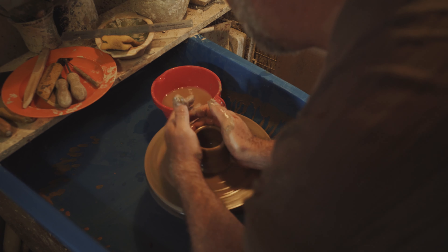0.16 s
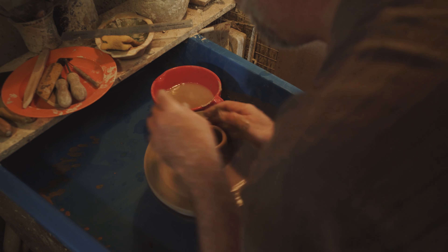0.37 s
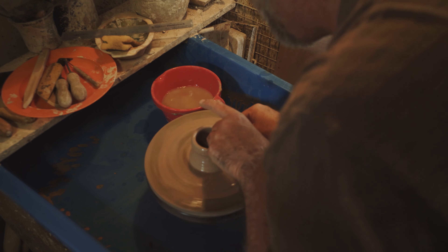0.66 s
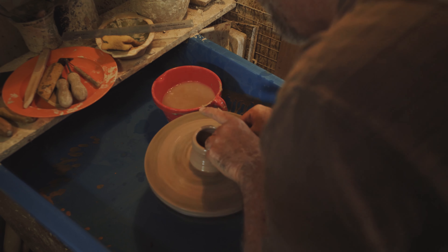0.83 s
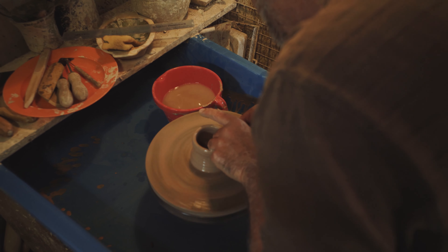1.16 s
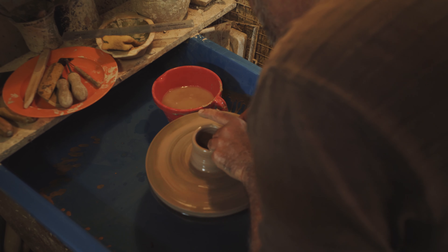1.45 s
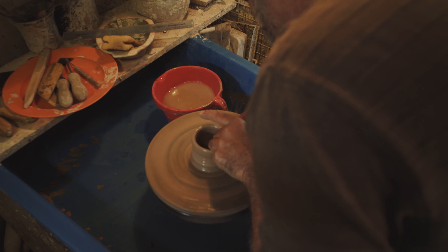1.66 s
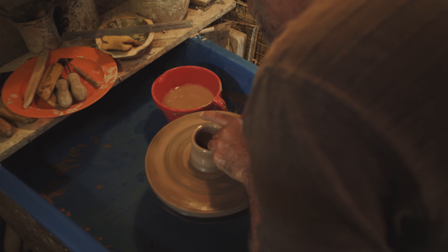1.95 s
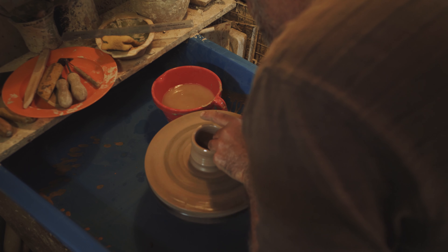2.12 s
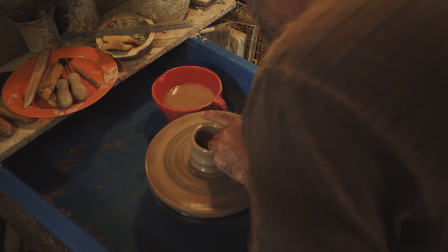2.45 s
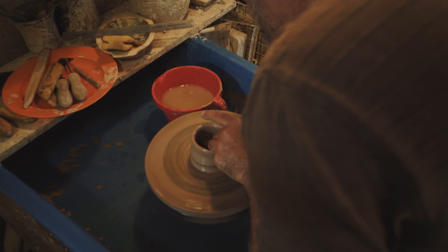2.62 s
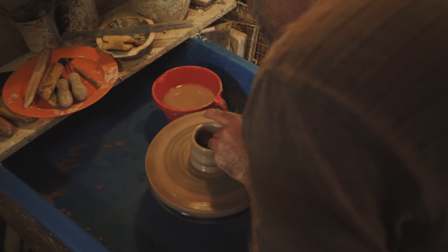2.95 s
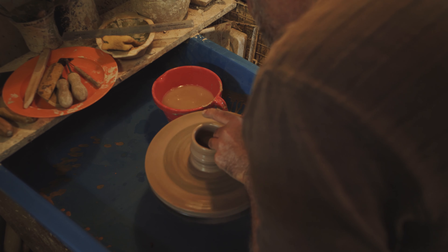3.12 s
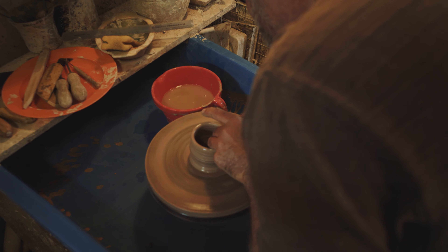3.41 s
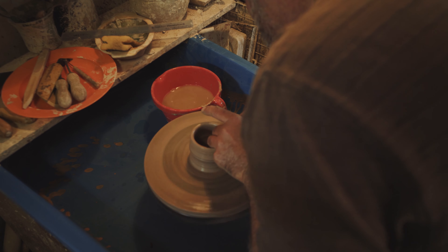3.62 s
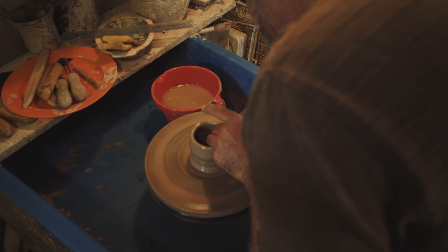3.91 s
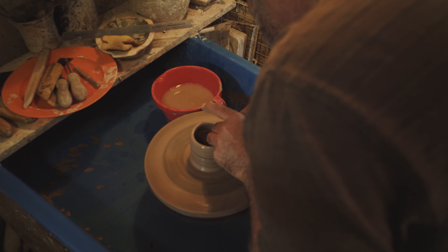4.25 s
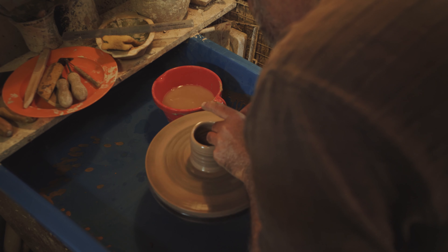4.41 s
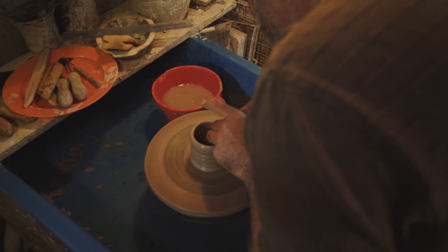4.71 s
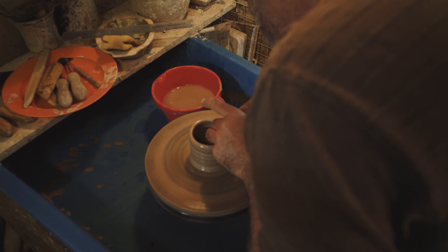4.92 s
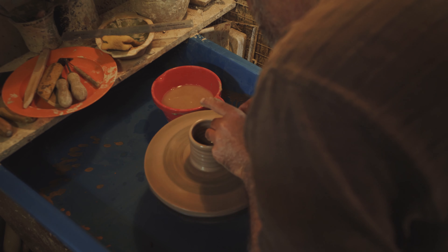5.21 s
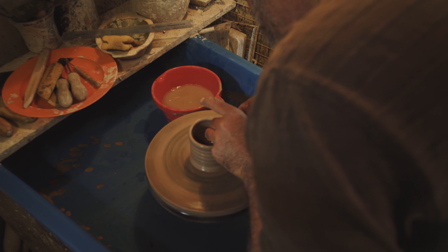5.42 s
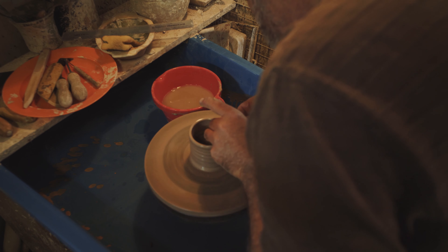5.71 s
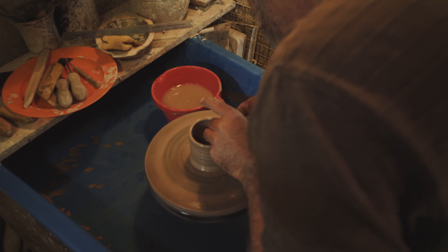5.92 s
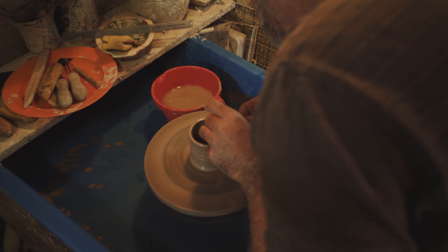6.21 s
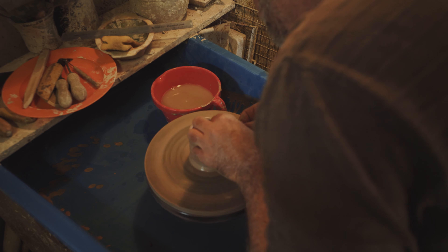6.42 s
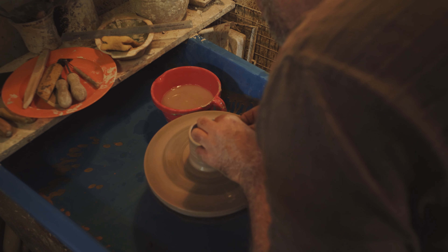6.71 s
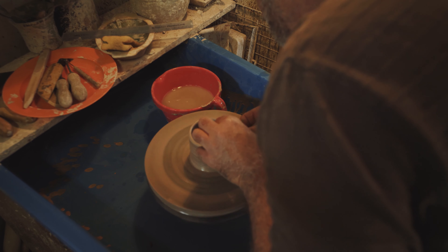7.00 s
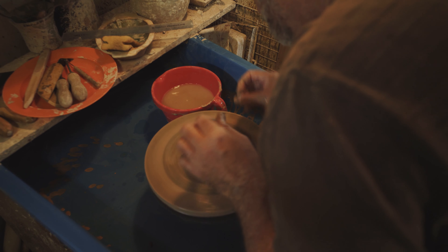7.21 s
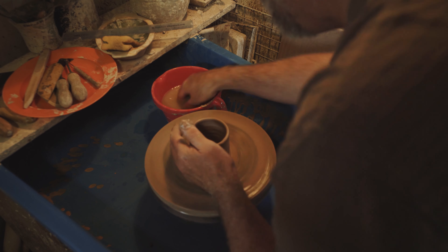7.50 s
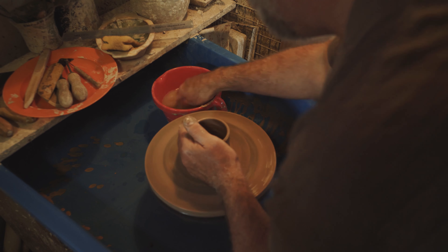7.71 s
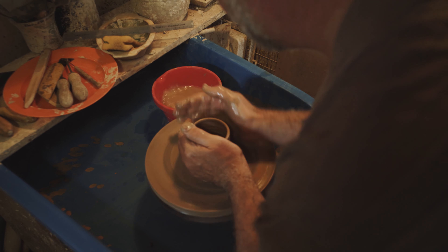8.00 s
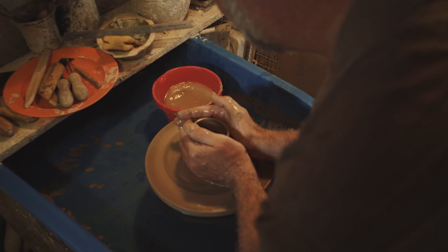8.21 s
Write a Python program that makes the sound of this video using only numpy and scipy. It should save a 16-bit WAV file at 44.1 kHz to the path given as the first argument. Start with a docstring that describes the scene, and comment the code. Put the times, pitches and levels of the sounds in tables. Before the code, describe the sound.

Close mono pickup in a small, fairly dry studio: steady mains-like hum, lumpy low rumble and airy motor whirr throughout. Early on come a soft tray bump, one small wet tick and a brief scratchy rub of a finger on wet clay. The middle is almost only the wheel, slightly slower. Near the end another low bump, a quick slosh, bubbly plops and fine spattering drops.

```python
"""A small pottery studio with an electric wheel running close by. Rectified mains pulses buzz in its motor,
built from tones of the mains ripple and of a shaft that slows as the hands load the clay. Belt and bearings
rumble in the tray and the housing whirrs, both as filtered noise. Sleeves and wet fingers rustle in shaped
noise, then a hand dips into a cup of slip water and drips: noise bursts and sliding, damped sines."""
import sys
import numpy as np
from scipy import signal
from scipy.fft import rfft, irfft, next_fast_len
from scipy.io import wavfile
from scipy.ndimage import uniform_filter1d, map_coordinates

SR = 44100
rng = np.random.default_rng(int(sys.argv[2]) if len(sys.argv) > 2 else 0)


def dump_mix(stems):
    """Bounce the given channels to the path in sys.argv[1] as a 16-bit WAV at rate SR."""
    frames = np.atleast_2d(stems).T  # one column per channel
    limited = np.clip(frames, -1, 1)  # hard clip at full scale
    pcm = np.round(limited * 32767).astype(np.int16)
    wavfile.write(sys.argv[1], SR, pcm)


def natural_amplitude(level_db):
    """Convert a level in decibels to a linear amplitude factor, elementwise."""
    exponent = np.asarray(level_db, float) / 20
    return 10 ** exponent


N = 368676  # length in samples

# Shaft speed under the load of the hands. Each row: time in seconds, turns per second.
SHAFT_SPEED = [(0, 62), (.6, 60.5), (1.4, 58.5), (1.9, 56), (2.4, 55.8), (2.65, 50.6), (3.15, 49.2),
               (3.55, 49.4), (3.8, 46), (5.3, 45.7), (6.3, 46.3), (6.65, 46.9), (6.8, 47.6), (7.75, 47.6),
               (7.95, 60.4), (8.36, 60.4)]
# Motor tones at m x ripple + n x shaft. Each row: multiple m of the ripple, multiple n of the shaft speed.
TONE_ORDERS = [(1, 0), (2, 0), (3, 0), (4, 0), (5, 0), (7, 0), (8, 0), (9, 0), (10, 0), (13, 0), (14, 0),
               (15, 0), (16, 0), (17, 0), (18, 0), (19, 0), (22, 0), (23, 0), (24, 0), (1, 1), (2, -1),
               (2, -2), (2, 1), (2, 2), (4, 2), (13, 1), (16, -1), (16, 1), (17, 1), (23, 1)]
# Strength of those tones, in the same order. Each entry: level in dB against the second ripple harmonic.
TONE_LEVELS_DB = [-15, 0, -2, -23.5, -29.5, -46.5, -44, -38, -43.5, -25.5, -26.5, -22, -20.5, -39.5, -45.5,
                  -26.5, -35.5, -40, -45, -13.5, -17.5, -19, -5, -14, -21, -32.5, -38, -30.5, -51, -35]
# Level of the mains and shaft tones together. Each row: time in seconds, level in dB.
HUM_LEVEL = [(0, -18.5), (.56, -22.5), (.83, -28), (1.1, -19.5), (1.4, -20), (2.6, -19), (3.8, -21.5),
             (5.5, -19), (6.2, -21), (6.95, -20.5), (7.28, -21.5), (7.6, -19.5), (7.92, -22), (8.05, -24),
             (8.19, -25), (8.36, -17.5)]
# Level of the lowest throb, which comes in lumps. Each row: time in seconds, level in dB.
THROB_LEVEL = [(0, -16.5), (1.1, -33.5), (1.35, -22), (1.95, -22.5), (2.5, -24.5), (3.8, -31), (8.36, -33)]
# Frame panel that lifts any shaft tone passing it. Each row: centre in Hz, half-power width in Hz, gain in dB.
PANEL_MODES = [(293.3, 3.9, 12)]
# Resonances of tray and frame. Each row: centre in Hz, half-power width in Hz, relative level in dB.
TRAY_MODES = [(13, 4.8, -14), (30, 19, -8.5), (38.6, 5.1, -6), (65, 12.6, 0), (87.3, 8.6, -3),
              (106.5, 16, -2.5), (162.8, 23, -5), (201, 13, -3.5), (258, 52, -3.5), (309.4, 11, -4),
              (323.8, 13, -2), (352.2, 15, -1), (373.6, 109, -7), (419.7, 50, -7.5), (471, 15, -4),
              (486.6, 29.7, -8.5)]
# Resonances of the motor housing. Each row: centre in Hz, half-power width in Hz, relative level in dB.
HOUSING_MODES = [(767, 24, 7), (1384, 34, 6), (1450, 20, 8.5), (1580, 180, 5), (1777, 33, 3),
                 (1885, 88, -1.5), (2298, 52, 0), (2780, 22, -7.5), (2960, 34, -6), (3110, 36, -2.5),
                 (3434, 77, -3.5), (4980, 200, -23), (5900, 340, -26), (7130, 300, -30)]
# Colour of the broad whirr under the housing peaks. Each row: frequency in Hz, relative level in dB.
WHIRR_COLOUR = [(300, -11.5), (520, 17), (640, 3), (1100, -2), (2000, -2.5), (3700, -10.5), (4600, -29.5),
                (7000, -34.5), (12000, -40.5), (16000, -43)]
# Colour of the sleeve rustle. Each row: frequency in Hz, relative level in dB.
CLOTH_COLOUR = [(1500, -34), (3000, 9.5), (4200, 7), (5500, -2), (7200, -6.5), (9000, -11), (12000, -12.5),
                (16000, -20.5)]
# Colour of the finger dragging through clay. Each row: frequency in Hz, relative level in dB.
DRAG_COLOUR = [(500, -22), (750, 1.5), (1100, 5.5), (1500, -1.5), (2200, -11.5), (3400, -12.5),
               (4200, -13.5), (4800, -22.5), (16000, -46.5)]
# Level of the soft sleeve hiss. Each row: time in seconds, level in dB.
RUSTLE_LEVEL = [(0, -53), (.74, -47), (1.13, -49), (1.5, -43), (1.96, -43), (2.31, -47.5), (2.89, -53),
                (3.6, -56), (7.2, -55), (7.7, -52.5), (8.36, -50.5)]
# Rubs of skin on wet clay and sloshes in the cup. Each row: start in seconds, end in seconds,
# level in dB before the fades, centre in Hz, width in octaves.
RUBS = [(.6, 0.923, -62, 11400, .5), (.62, .92, -65, 7600, .5), (1.358, 1.585, -57, 9200, 1.1),
        (1.58, 1.72, -57, 7000, .4), (1.769, 2.138, -62.5, 6450, 2.4), (1.81, 1.95, -41, 4160, 0.22),
        (1.973, 2.132, -41, 3930, 0.73), (2.203, 2.316, -57.5, 8240, 2), (2.541, 2.745, -63.5, 8600, 1.2),
        (7.24, 7.57, -58.5, 6840, 2.2), (7.657, 7.764, -37, 890, 0.63), (7.806, 7.857, -33.5, 2480, 1.7),
        (7.858, 7.993, -43.5, 3300, 1.5), (8.206, 8.293, -51, 4580, 3.1)]
# Soft bumps against the tray. Each row: start in seconds, level in dB before onset and decay,
# pitch in Hz, 60 dB decay in seconds.
TRAY_BUMPS = [(0.931, -12, 98.9, 0.57), (7.688, -7, 97.5, 0.46)]
# Bubbles and drips. Each row: start in seconds, level in dB before onset and decay, starting pitch in Hz,
# half the share by which the pitch climbs over the ring (negative falls), 60 dB decay in seconds.
BUBBLE_RINGS = [(7.658, -8.5, 890, 0.078, 0.034), (7.661, -15, 723, 0, 0.066),
                (7.685, -18, 1920, -0.051, 0.031), (7.801, -18, 1017, 0.23, .081),
                (7.814, -20, 1760, -.18, 0.066), (7.827, -8.5, 1225, -0.57, 0.033),
                (7.89, -19.5, 1252, .3, .071)]
# Ticks and splats of water and wet clay. Each row: start in seconds, starting level of the body in dB,
# centre in Hz, width in octaves.
SPLAT_BURSTS = [(.401, -44, 5000, 1.3), (1.294, -25, 2920, 0.57), (1.465, -46.5, 9750, .46),
                (3.733, -51.5, 5400, 1.2), (4.04, -53, 11500, 0.49), (4.397, -50, 6000, 1.2),
                (5.745, -47, 5980, 1.2), (7.621, -40.5, 8940, 3), (7.627, -42.5, 12100, 1.8),
                (7.658, -19, 3540, 3), (7.659, -31.5, 9370, 0.21), (7.684, -25, 2970, 1.4),
                (7.795, -26.5, 2660, .37), (7.802, -36, 5220, .8), (7.826, -38, 3850, 3.8),
                (7.83, -23.5, 3690, 0.27), (7.838, -34, 4930, 0.28), (7.878, -46, 12950, 0.72),
                (7.9, -45, 11200, 2), (7.912, -40.5, 6600, 2.2), (7.939, -36, 3340, 0.48),
                (7.942, -38, 9650, 0.59), (7.95, -31, 3590, 0.32), (7.956, -35, 5350, 2),
                (7.992, -40, 6370, .3), (8.029, -42.5, 5860, .4), (8.051, -45, 10900, .5),
                (8.106, -43.5, 13100, .44), (8.233, -40.5, 5900, 1.8), (8.249, -30.5, 2390, 2.3)]
# Fine spatter as water runs off the hand. Each row: start in seconds, end in seconds,
# starting level of each drop in dB, middle pitch in Hz.
SPATTER_SPANS = [(7.655, 7.709, -41, 3470), (7.796, 7.861, -37, 3780), (7.871, 8.276, -48, 5460)]

RIPPLE_HZ = 99.838  # twice the mains frequency
GEARING = 11.7  # shaft turns per turn of the wheel head
WAVER_DB = 0.7  # each motor tone wavers on its own
TRAY_DB, WHIRR_DB = -17.5, -31.5  # middle levels of rumble and whirr
TRAY_FOLLOWS, WHIRR_FOLLOWS = 0.22, 0.3  # dB for each dB that the hum swings
WHIRR_DB_PER_TURN = 0.08  # the whirr grows with each turn per second of the shaft
LUMPS_PER_S, LUMP_DB = 2.2, 2.6  # random swell of the throb
# A finger drags through the clay, easing off slowly, then lets go.
DRAG_START_S, DRAG_ATTACK_S, DRAG_HOLD_S, DRAG_RELEASE_S = 1.766, 0.11, 0.17, 0.074
# Top level, then the start, end of hold and end against it.
DRAG_DB, DRAG_FROM_DB, DRAG_SAG_DB, DRAG_OFF_DB = -27.5, -16, -2.5, -14
# Decay of every burst, plus this much over its width in octaves: narrow ones ring on.
SPLAT_T60_S, NARROW_T60_S = 0.012, 0.0087
CRACK_DB, CRACK_T60_S = -8, 0.003  # sharp first contact, its amplitude multiplied by the width in octaves
DROPS_EACH = 16  # drops in each span of spatter
DROP_SPREAD_OCTAVES, DROP_WIDTH_OCTAVES = 0.47, 0.55


def unit(x):
    """Scales a signal to rms 1."""
    return x / np.sqrt(np.mean(x ** 2) + 1e-20)


def curve(rows):
    """Draws (seconds, value) points as one value per sample."""
    s, values = np.transpose(rows)
    return np.interp(np.arange(N) / SR, s, values)


def wobble(rate):
    """Drifts smoothly at random, with rate knots a second."""
    knots = rng.standard_normal(int(N * rate / SR) + 4)
    return map_coordinates(knots, [np.arange(N) * rate / SR])


def slope(points, hz):
    """Joins (Hz, dB) points into a gain on a log frequency axis."""
    f, db = np.transpose(points)
    return natural_amplitude(np.interp(np.log(hz + 1), np.log(f + 1), db))


def peaks(modes, hz):
    """Sums steep-sided resonances in power."""
    return np.sqrt(sum(natural_amplitude(db) ** 2 / (1 + (2 * (hz - c) / w) ** 4) for c, w, db in modes))


def hump(hz, centre_hz, octaves):
    """Shapes a bell on a log axis, with octaves between its 1/e points."""
    return np.exp(-(np.log2((hz + 1) / centre_hz) * 2 / octaves) ** 2)


def coloured(x, gain):
    """Filters x by a gain of frequency and scales it to rms 1."""
    m = next_fast_len(N + 8192)
    spectrum = rfft(x, m) * gain(np.fft.rfftfreq(m, 1 / SR))
    return unit(irfft(spectrum, m)[:N])


def banded_noise(x, centre_hz, octaves):
    """Keeps one bell-shaped band of a short noise, at rms 1."""
    band = hump(np.fft.rfftfreq(len(x), 1 / SR), centre_hz, octaves)
    return unit(irfft(rfft(x) * band, len(x)))


def patchy(x, depth_db):
    """Makes random louder and softer patches, several hundred Hz by a few tens of ms."""
    z = signal.stft(x, nperseg=512)[2]
    field = uniform_filter1d(rng.standard_normal(z.shape), size=9, axis=0)
    field = uniform_filter1d(field, size=11, axis=1)
    return signal.istft(z * natural_amplitude(depth_db * unit(field)), nperseg=512)[1][:N]


def grit(rate, spread_db):
    """Scatters dense random micro-slips of uneven size, rate a second."""
    slips = rng.standard_normal(N) * (rng.random(N) < rate / SR)
    return slips * natural_amplitude(spread_db * rng.standard_normal(N))


def ring(db, pitch_hz, rise, t60):
    """Damps a sine with a soft start while its pitch slides."""
    t = np.arange(round(t60 * SR)) / SR
    start = 1 - np.exp(-t * 40 / t60)
    return natural_amplitude(db - 60 * t / t60) * start * np.sin(2 * np.pi * pitch_hz * (t + rise * t ** 2 / t60))


def add(out, s, sound):
    """Mixes a short sound in at s seconds."""
    part = out[round(s * SR):][:len(sound)]
    part += sound[:len(part)]


def studio(x):
    """Walls and shelves return a short diffuse answer: decaying noise convolved with the sound."""
    t = np.arange(SR // 4) / SR
    tail = rng.standard_normal(len(t)) * natural_amplitude(-60 * t / 0.29) * (t > 0.004)  # decay 0.29 s, gap 4 ms
    return signal.fftconvolve(x, tail / np.linalg.norm(tail))[:N]


def bumps():
    """An arm nudges the tray, which booms briefly as a damped low sine."""
    out = np.zeros(N)
    for s, db, hz, t60 in TRAY_BUMPS:
        add(out, s, ring(db, hz, 0, t60))
    return out


def sleeves():
    """Cloth hisses softly: patchy noise with a fluttering level."""
    cloth = coloured(patchy(rng.standard_normal(N), depth_db=1.7), lambda hz: slope(CLOTH_COLOUR, hz))
    return natural_amplitude(curve(RUSTLE_LEVEL) + 0.59 * wobble(19)) * cloth


def rubs():
    """Skin slips on wet clay and water sloshes: gritty noise in one band per stroke."""
    out = np.zeros(N)
    slips = grit(rate=2200, spread_db=-0.5) * natural_amplitude(3.9 * wobble(40))
    for start, end, db, centre_hz, octaves in RUBS:
        rub = slips[round(start * SR):round(end * SR)]
        fade = np.sqrt(np.hanning(len(rub)))
        add(out, start, natural_amplitude(db) * fade * banded_noise(rub, centre_hz, octaves))
    return out


def finger_drag():
    """A finger ploughs the clay in many small slips, lower and grittier than the rubs."""
    slips = patchy(grit(rate=1600, spread_db=3.5), depth_db=3.5)
    drag = coloured(slips, lambda hz: slope(DRAG_COLOUR, hz))
    corners = np.cumsum([DRAG_START_S, DRAG_ATTACK_S, DRAG_HOLD_S, DRAG_RELEASE_S])
    levels_db = [DRAG_FROM_DB, 0, DRAG_SAG_DB, DRAG_OFF_DB]
    press_db = np.interp(np.arange(N) / SR, corners, levels_db, left=-np.inf, right=-np.inf)
    return natural_amplitude(DRAG_DB + press_db + 1.1 * wobble(40)) * drag


def spatter():
    """Drops fall at chance times and pitches, in rows like those of the splats."""
    rows = []
    for start, end, db, centre_hz in SPATTER_SPANS:
        when = start + rng.random(DROPS_EACH) * (end - start)
        pitch_hz = centre_hz * 2 ** (DROP_SPREAD_OCTAVES * rng.standard_normal(DROPS_EACH))
        rows += [(s, db, hz, DROP_WIDTH_OCTAVES) for s, hz in zip(when, pitch_hz)]
    return rows


def splats():
    """Water and wet clay strike with a sharp crack over a dying body of noise in one band."""
    out, t = np.zeros(N), np.arange(SR // 10) / SR
    for s, db, centre_hz, octaves in SPLAT_BURSTS + spatter():
        spray = banded_noise(rng.standard_normal(len(t)), centre_hz, octaves)
        body = natural_amplitude(db - 60 * t / (SPLAT_T60_S + NARROW_T60_S / octaves))
        crack = octaves * natural_amplitude(db + CRACK_DB - 60 * t / CRACK_T60_S)
        add(out, s, (body + crack) * spray)
    return out


def bubbles():
    """Trapped air rings as sliding sines, made unsteady by the churning surface."""
    out = np.zeros(N)
    for s, db, pitch_hz, rise, t60 in BUBBLE_RINGS:
        pop = ring(db, pitch_hz, rise, t60)
        # 300 random knots a second
        churn = map_coordinates(rng.standard_normal(64), [np.arange(len(pop)) * 300 / SR])
        add(out, s, pop * (1 + 0.27 * churn))
    return out


def tray_rumble(swing_db, turn):
    """Belt and bearings shake the tray: resonant noise above 52 Hz over a lumpy throb below it."""
    tray = coloured(rng.standard_normal(N), lambda hz: peaks(TRAY_MODES, hz) * (hz > 52))
    throb = coloured(rng.standard_normal(N), lambda hz: peaks(TRAY_MODES, hz) * (hz <= 52))
    tray_db = TRAY_DB + TRAY_FOLLOWS * swing_db + 0.34 * turn + 1.4 * wobble(5.2)
    throb_db = curve(THROB_LEVEL) + LUMP_DB * wobble(LUMPS_PER_S)
    return natural_amplitude(tray_db) * tray + natural_amplitude(throb_db) * throb


def housing_whirr(swing_db, ripple, shaft_hz):
    """Brushes spark harder at each current pulse; the noise takes the housing's resonances."""
    sparks = rng.standard_normal(N) * (1 + 0.063 * np.cos(ripple))
    whirr = coloured(patchy(sparks, depth_db=0.43),
                     lambda hz: np.hypot(slope(WHIRR_COLOUR, hz), peaks(HOUSING_MODES, hz)))
    speed_db = WHIRR_DB_PER_TURN * (shaft_hz - shaft_hz.mean())
    return natural_amplitude(WHIRR_DB + WHIRR_FOLLOWS * swing_db + speed_db + 0.69 * wobble(3.5)) * whirr


def motor_tones(ripple, shaft, shaft_hz):
    """Current pulses and shaft rotation combine into tones at sums and differences of their harmonics."""
    hum = 0
    for (m, n), db in zip(TONE_ORDERS, TONE_LEVELS_DB):
        lift = np.hypot(1, peaks(PANEL_MODES, m * RIPPLE_HZ + n * shaft_hz)) if n else 1
        # low tones take their own ways through the frame; the housing's buzz stays close to the current pulse
        path = rng.standard_normal() * (0.6 if m > 12 else np.pi)
        tone = np.sqrt(2) * np.cos(m * ripple + n * shaft + path)
        hum = hum + lift * natural_amplitude(db + WAVER_DB * wobble(3.2)) * tone
    return hum


def wheel():
    """One ripple and one loaded shaft drive the tones, the tray and the housing."""
    hum_db, shaft_hz = curve(HUM_LEVEL), curve(SHAFT_SPEED)
    swing_db = hum_db - hum_db.mean()
    ripple = 2 * np.pi * RIPPLE_HZ * np.arange(N) / SR
    shaft = 2 * np.pi * np.cumsum(shaft_hz) / SR + 0.065 * wobble(2.1)  # phase in radians
    turn = np.cos(shaft / GEARING)  # the off-centre load comes round once a turn
    hum = natural_amplitude(hum_db + 0.48 * turn) * motor_tones(ripple, shaft, shaft_hz)
    return hum + tray_rumble(swing_db, turn) + housing_whirr(swing_db, ripple, shaft_hz)


def scene():
    """Mixes wheel, hands and water to mono, with the room answering the water alone."""
    hands = sleeves() + rubs() + finger_drag()
    water = splats() + bubbles()
    return (wheel() + hands + bumps() + water + natural_amplitude(-12.5) * studio(water))[None]


def top_cut(x):
    """Nothing passes above the cut-off."""
    return signal.sosfilt(signal.butter(12, 15830, fs=SR, output="sos"), x)


def record(dry):
    """Rounds off loud peaks softly towards a ceiling of 0.8."""
    hardness = 3.6
    soft = dry / (1 + np.abs(dry / 0.8) ** hardness) ** (1 / hardness)
    return top_cut(soft)


dry = scene()
out = record(dry)
dump_mix(out)
```